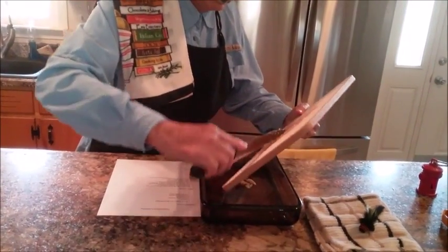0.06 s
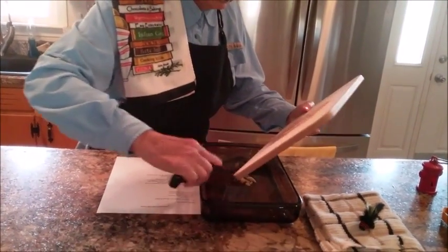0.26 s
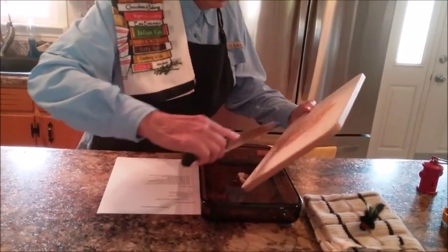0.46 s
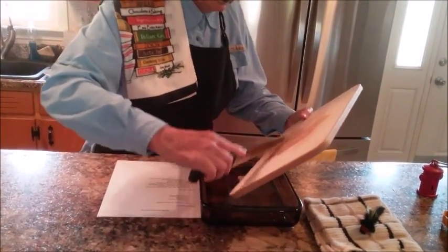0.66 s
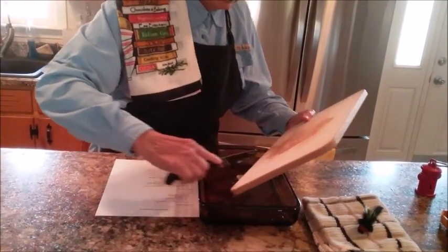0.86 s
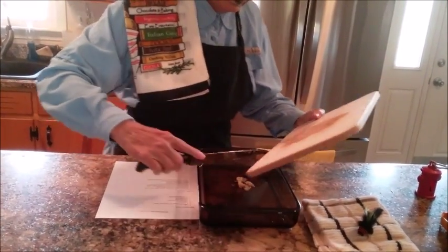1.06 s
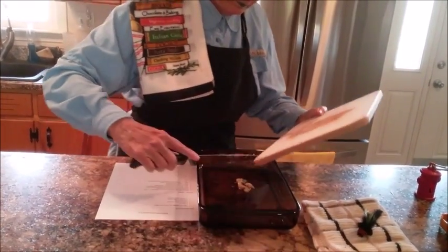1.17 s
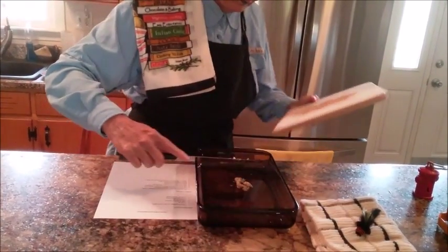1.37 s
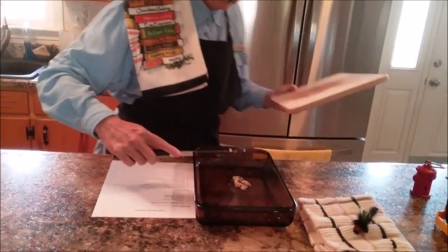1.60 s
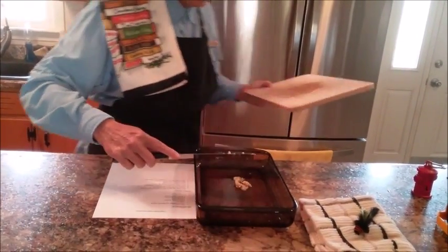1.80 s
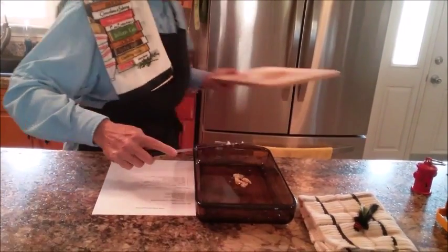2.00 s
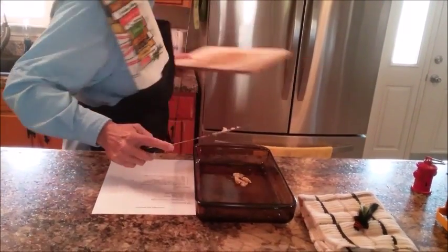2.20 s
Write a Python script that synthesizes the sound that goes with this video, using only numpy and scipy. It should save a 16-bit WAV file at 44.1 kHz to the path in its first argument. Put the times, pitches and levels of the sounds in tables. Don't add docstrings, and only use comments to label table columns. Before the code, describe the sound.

A knife blade ticks onto a wooden cutting board and scrapes firmly, then after a pause ticks and scrapes again more lightly; a hard kitchen rings briefly, with low fridge hum and stereo microphone hiss.

```python
import sys
import numpy as np
from scipy import signal
from scipy.fft import rfft, irfft, next_fast_len
from scipy.io import wavfile
from scipy.ndimage import uniform_filter1d

SR = 44100
rng = np.random.default_rng(int(sys.argv[2]) if len(sys.argv) > 2 else 0)


def volts_from_decibels(level):
    exponent = np.asarray(level, float) / 20
    return 10 ** exponent


def dump(signal):
    limited = np.clip(np.atleast_2d(signal).T, -1, 1)
    pcm = np.round(limited * 32767).astype(np.int16)
    wavfile.write(sys.argv[1], SR, pcm)


N = 99225

# (frequency [Hz], level [dB])
FLOOR = [(45, -10), (110, -1), (400, -4), (1500, -7), (2500, -12), (4800, -13), (6000, -18), (16000, -18.5)]
# (frequency [Hz], left minus right [dB])
FLOOR_PAN = [(60, 8), (240, -1), (950, 0), (3770, -2), (15000, 1)]
# (frequency [Hz], left-right likeness [0-1])
FLOOR_SAME = [(25, 0.45), (100, 0.69), (500, 0.19), (1500, 0.37), (4500, 0.34), (8000, 0.009)]
# (frequency [Hz], width [Hz], level [dB rms])
HUM = [(59.8, 1.9, -94.5), (79, 4.9, -81), (117.7, 5.2, -73), (207, 13.6, -79.5), (301.8, 3.1, -79)]

# (time [s], level [dB], crack [dB], bright edge [dB])
TOUCHES = [
    (0.1351, -41, -5.5, -18),
    (0.8076, -41.5, -5.5, -12.5),
]
# (frequency [Hz], level [dB], T60 [s])
TOUCH_MODES = [
    [(395, -19, 0.14), (588, -21.5, 0.34), (750, -14, 0.061), (1410, -8, 0.026), (1900, -7.5, 0.052),
     (2330, 2.5, 0.0087), (2970, -7, 0.021), (3520, -19, 0.014), (3820, 0, 0.028), (4280, -10, 0.031),
     (4420, -12, 0.061), (4740, -4.5, 0.011), (5300, -4, 0.0074), (6300, -17, 0.0091)],
    [(490, -15, 0.25), (650, -6.5, 0.039), (883, -8, 0.16), (1380, -7, 0.026), (2130, 0.5, 0.025),
     (2660, -9, .02), (3100, -11, 0.01), (4000, 0.5, 0.039), (4870, -2, 0.016), (5880, -11.5, .03),
     (6395, -29, .03)],
]

# (time [s], level [dB])
STROKES = [
    [(.203, -80), (.217, -50.5), (.228, -41.5), (.254, -34.5), (.285, -30.5), (.296, -39.5), (.304, -37.5),
     (.31, -72), (.33, -62)],
    [(.806, -68), (.812, -51.5), (.845, -44.5), (.86, -47.5), (.878, -43), (.888, -43), (.903, -38.5),
     (.911, -70), (.93, -72)],
]
# (frequency [Hz], width [Hz], level [dB])
HELD_FIRST = [(391, 27, -20), (669, 58, -17), (899, 29.6, -4), (1291, 52, -2), (1420, 82, -9.5),
              (1845, 72, -2.5), (2104, 116, -7.5), (2556, 48, -1), (2796, 74, -5), (2916, 39, -1.5),
              (3220, 140, -6), (3958, 160, 1), (4130, 460, -10), (4810, 143, -1.5)]
# (frequency [Hz], width [Hz], level [dB])
HELD_SECOND = [(399, 21, -19), (568, 28, -10.5), (666, 50, -17), (907, 57, -6), (1004, 30, -6.5),
               (1368, 85, -2), (2190, 210, -2), (2250, 40, -9), (2815, 210, -4), (4100, 85, -0.5),
               (4390, 65, -5), (5100, 43, -1.5), (5853, 73, -10.5), (7420, 77, -39)]
# (frequency [Hz], level [dB])
GRIT = [(300, -25), (800, -17.5), (2000, -6), (4600, 2), (5600, -9), (7000, -28), (9000, -42.5),
        (16000, -59.5)]
GRIT_DB = [-7, -4.5]
# (frequency [Hz], ring length [s], 60 dB down after 0.39 of it, level [dB])
BLADE = [(3120, 0.47, -26), (5100, 3.7, -37)]
# (time [s], level [dB], plucked mode [Hz], pluck level [dB])
SNAGS = [(.2205, -48, 1340, -43), (.2305, -29.5, 1260, -49), (.2395, -40, 3130, -26),
         (.2495, -40, 3050, -25), (.2605, -36, 1290, -36), (.268, -30, 3600, -29), (.283, -37, 3260, -28),
         (.29, -25, 3040, -37), (.2948, -34.5, 2470, -37), (.3, -30.5, 2560, -26),
         (0.3015, -24.5, 4080, -19.5), (0.3042, -29, 4720, -23), (.851, -51, 2130, -35),
         (.868, -36.5, 2250, -36), (.8775, -38, 2150, -31), (.884, -48, 2110, -37), (.894, -49, 2240, -44),
         (.899, -46, 1340, -33), (.9035, -38, 4450, -29)]

# (start [s], full speed [s], stop [s])
SLIDES = [
    (.212, .25, .306),
    (.807, .88, .907),
]
# (frequency [Hz], level [dB])
SING = [(4000, -13), (6000, 6), (8000, -6), (10500, -5), (13000, -7), (16000, -9)]
SING_DB = [-47, -53.5]
# (frequency [Hz], width [Hz], level [dB])
EDGE = [
    [(7600, 160, 5), (8820, 76, 7), (10200, 110, -8), (11740, 270, 3)],
    [(7200, 250, 10), (8330, 120, 8), (12000, 490, 2), (13500, 640, 10.5)],
]
# (start [s], peak [s], in some rows outside start to stop and then only bending the
# level, stop [s], frequency [Hz], level [dB])
CHATTER = [(.222, 0.269, 0.271, 1278, -36), (.283, .295, .306, 2548, -36), (0.27, 0.267, .298, 3200, -36.5),
           (0.28, .297, .311, 876, -43.5), (0.26, 0.41, .31, 1280, -37.5), (0.25, 0.39, .312, 1850, -45.5),
           (0.219, 0.217, 0.25, 680, -54), (0.218, .29, 0.304, 385, -56.5), (0.84, .885, .912, 1388, -45.5),
           (.885, .903, .915, 4420, -43.5), (0.842, 0.94, .9, 2125, -42), (0.853, .895, .91, 905, -51.5),
           (0.89, 1, .908, 2600, -46), (.81, .82, .9, 400, -66.5)]

# (frequency [Hz], T60 [s])
KITCHEN = [(300, 0.49), (800, 0.41), (2100, 0.39), (5500, 0.35), (12000, 0.49)]
# (frequency [Hz], level [dB])
WET = [(300, -2.5), (1000, 0.5), (3000, -0.5), (6000, -1.5), (12000, -12)]
# (frequency [Hz], left-right likeness [0-1])
ROOM_SAME = [(300, 0.92), (1000, 0.21), (2500, 0.056), (5000, 0.07), (12000, 0.044)]
# (frequency [Hz], left minus right [dB])
SOURCE_PAN = [(200, -2), (700, 0.5), (1500, -1), (3000, -3.5), (5000, -0.5), (9000, 5.5), (14000, 7.5)]
# (frequency [Hz], lead of the left [rad])
PORT_TURN = [(300, 0.42), (1500, 0.43), (4500, 1.19), (7000, 1.15), (14000, 1.74)]

FLOOR_DB, PATCHY_DB, HUM_STEADY = -66.5, 0.8, 0.35
CRACK_T60_S, BRIGHT_T60_S, PLUCK_T60_S = 0.03, 0.029, 0.013
CATCHES_PER_S, CATCH_SPREAD_DB, SMOOTH_RUB = 3000, 2, 0.5
JUDDER_DB, JUDDER_S = 1.6, 0.003
SNAG_BLUNT_DB = -4
MODE_WANDER, WANDER_S = 0.007, 0.025
BOARD_S = 1.2
SING_RISE_DB = -18
CHATTER_RELEASE_S = 0.012
ROOM_BUILD_S, TOUCH_ROOM_DB, CHATTER_ROOM_DB = 0.0022, -8, -9


def evened(x):
    return x / np.sqrt(np.mean(x ** 2) + 1e-20)


def read(points, hz):
    f, value = np.transpose(points)
    return np.interp(np.log(hz + 1), np.log(f + 1), value)


def coloured(x, gain):
    size = next_fast_len(x.shape[-1] + 4096)
    spectrum = rfft(x, size) * gain(np.fft.rfftfreq(size, 1 / SR))
    return irfft(spectrum, size)[..., :x.shape[-1]]


def shaped(x, points):
    return coloured(x, lambda hz: volts_from_decibels(read(points, hz)))


def resonate(x, hz, width):
    r = np.exp(-np.pi * width / SR)
    return 2 * signal.lfilter([1 - r], [1, -r * np.exp(2j * np.pi * hz / SR)], x).real


def widened(z, likeness):
    same = np.clip(likeness, -1, 1)[:, None]
    return np.array([z[0], same * z[0] + np.sqrt(1 - same ** 2) * z[1]])


def room_tone():
    frames, hz = N // 256 + 5, np.fft.rfftfreq(1024, 1 / SR)
    a, b, c, d, patches = rng.standard_normal((frames, 513, 5)).T
    patches = uniform_filter1d(patches, 12, 0)
    patches = evened(uniform_filter1d(patches, 14, 1))
    z = widened([a + 1j * b, c + 1j * d], read(FLOOR_SAME, hz))
    pan = read(FLOOR_PAN, hz)[:, None] / 2
    z *= volts_from_decibels(read(FLOOR, hz)[:, None] + PATCHY_DB * patches + np.array([pan, -pan]))
    hiss = signal.istft(z, nperseg=1024, noverlap=768)[1][:, :N]
    hiss = volts_from_decibels(FLOOR_DB) * evened(hiss)

    t, hum = np.arange(N) / SR, np.zeros((2, N))
    for f, width, db in HUM:
        drive = rng.standard_normal(N) + 0.35 * rng.standard_normal((2, N))
        waver = evened(resonate(drive, f, width))
        steady = np.sin(2 * np.pi * (f * t + rng.random()))
        hum += volts_from_decibels(db) * (waver + HUM_STEADY * steady)
    return hiss + hum


def touch(start, db, crack_db, bright_db, modes):
    t = np.maximum(np.arange(N) / SR - start, 0)
    ring = np.zeros(N)
    for k, (hz, mode_db, t60) in enumerate(modes):
        ring += (-1) ** k * volts_from_decibels(mode_db - 60 * t / t60) * np.sin(2 * np.pi * hz * t)
    crack = evened(shaped(rng.standard_normal(N), GRIT)) * volts_from_decibels(crack_db - 60 * t / CRACK_T60_S)
    bright = evened(shaped(rng.standard_normal(N), SING)) * volts_from_decibels(bright_db - 60 * t / BRIGHT_T60_S)
    attack = np.minimum(t / 0.00018, 1)
    return volts_from_decibels(db) * attack * (ring + crack + bright)


def force_of(stroke):
    s, db = np.transpose(stroke)
    catch_db = CATCH_SPREAD_DB * np.minimum(rng.exponential(1, N), 4)
    catches = (rng.random(N) < CATCHES_PER_S / SR) * volts_from_decibels(catch_db)
    rub = evened(catches * rng.choice([-1., 1.], N)) + SMOOTH_RUB * rng.standard_normal(N)
    judder = evened(uniform_filter1d(rng.standard_normal(N), round(JUDDER_S * SR)))
    rub = evened(rub * volts_from_decibels(JUDDER_DB * judder))
    force = rub * volts_from_decibels(np.interp(np.arange(N) / SR, s, db, -140, -140))
    bump = 2.75 * np.hanning(7)[1:-1]
    for at, snag_db, *_ in SNAGS:
        if s[0] < at < s[-1]:
            force[round(at * SR):][:5] += volts_from_decibels(snag_db + SNAG_BLUNT_DB) * bump
    return rub, force


def drifting(x, hz, width):
    t = np.arange(x.shape[-1]) / SR
    path = np.interp(t / WANDER_S, np.arange(120), rng.standard_normal(120))
    turn = np.exp(2j * np.pi * np.cumsum(hz * (1 + MODE_WANDER * path)) / SR)
    r = np.exp(-np.pi * width / SR)
    return 2 * (turn * signal.lfilter([1 - r], [1, -r], x * turn.conj())).real


def scrape(stroke, held, grit_db):
    def rms(x):
        return np.sqrt(np.mean(x ** 2))

    rub, force = force_of(stroke)
    both = np.array([rub, force])[:, :round(BOARD_S * SR)]
    board = sum((-1) ** k * volts_from_decibels(db) * drifting(both, hz, width) for k, (hz, width, db) in enumerate(held))
    grit = shaped(both, GRIT)
    wood = board[1] / rms(board[0]) + volts_from_decibels(grit_db) * grit[1] / rms(grit[0])
    steel = sum(volts_from_decibels(db) * resonate(force, hz, 5.7 / t60) * 14 for hz, t60, db in BLADE)
    return np.pad(wood, (0, N - len(wood))) + steel


def sing(slide, db, edge):
    start, full, stop = slide
    both, left, right = rng.standard_normal((3, N))
    source = both + 0.58 * np.array([left, right])
    hiss = shaped(source, SING)
    hiss = hiss + 0.5 * sum(volts_from_decibels(mode_db) * resonate(hiss, hz, width) for hz, width, mode_db in edge)
    times, levels = [start, full, stop, stop + 0.0026], [SING_RISE_DB, 0, 0, -30]
    speed_db = np.interp(np.arange(N) / SR, times, levels, -100, -100)
    flutter = evened(uniform_filter1d(rng.standard_normal(N), 130))
    return evened(hiss) * volts_from_decibels(db + speed_db + 1.7 * flutter)


def chatter(start, peak, stop, hz, db):
    waver = evened(uniform_filter1d(rng.standard_normal((2, N)), 500, axis=1))
    times = [start - CHATTER_RELEASE_S, start, peak, stop, stop + CHATTER_RELEASE_S]
    level_db = np.interp(np.arange(N) / SR, times, [-41, -11.5, 2.0, -0.5, -30], -100, -100)
    tone = np.sin(2 * np.pi * np.cumsum(hz + 10 * waver[1]) / SR)
    return volts_from_decibels(db + level_db + 2.0 * waver[0]) * tone


def plucks():
    out, t = np.zeros(N), np.arange(2000) / SR
    attack = np.minimum(t / 0.00069, 1)
    for at, _, hz, db in SNAGS:
        ring = volts_from_decibels(db - 60 * t / PLUCK_T60_S) * np.sin(2 * np.pi * hz * t)
        out[round(at * SR):][:len(t)] += attack * ring
    return out


def kitchen(x):
    taps = np.zeros((2, SR))
    at = np.arange(200, SR - 20, 20) + rng.integers(0, 20, (2, (SR - 201) // 20))
    np.put_along_axis(taps, at, rng.choice([-1., 1.], at.shape), 1)
    hz, t, z = signal.stft(taps, SR, nperseg=256)
    z = widened(z, read(ROOM_SAME, hz))
    build = 1.3 - np.exp(-t / ROOM_BUILD_S)
    decay = volts_from_decibels(-60 * t / read(KITCHEN, hz)[:, None])
    tail = signal.istft(z * build * decay, SR, nperseg=256)[1]
    tail = tail / np.linalg.norm(tail[0])
    return shaped(signal.fftconvolve(x[None], tail, axes=1)[:, :N], WET)


def at_ports(near):
    def port(hz):
        return volts_from_decibels(read(SOURCE_PAN, hz) / 2) * np.exp(0.5j * read(PORT_TURN, hz))

    return np.array([coloured(near[0], port), coloured(near[1], lambda hz: 1 / port(hz))])


def scene():
    ticks = sum(touch(*row, modes) for row, modes in zip(TOUCHES, TOUCH_MODES))
    scrapes = sum(scrape(*row) for row in zip(STROKES, (HELD_FIRST, HELD_SECOND), GRIT_DB))
    knife = scrapes + sum(sing(*row) for row in zip(SLIDES, SING_DB, EDGE))
    slips = sum(chatter(*row) for row in CHATTER) + plucks()
    direct = at_ports(knife + ticks + slips)
    send = knife[0] + volts_from_decibels(TOUCH_ROOM_DB) * ticks + volts_from_decibels(CHATTER_ROOM_DB) * slips
    return direct + kitchen(send) + room_tone()


def low_pass(x):
    return signal.sosfilt(signal.butter(12, 15900, fs=SR, output="sos"), x)


def record(dry):
    mix = dry - 0.0004
    return low_pass(mix)


dry = scene()
out = record(dry)
dump(out)
```